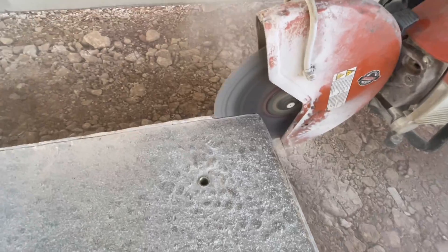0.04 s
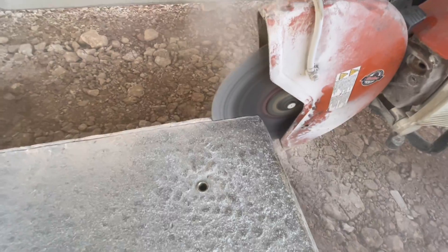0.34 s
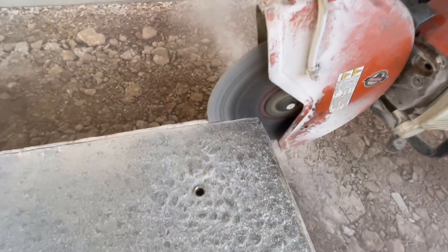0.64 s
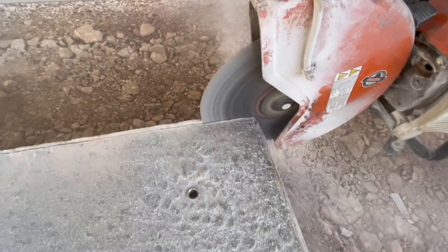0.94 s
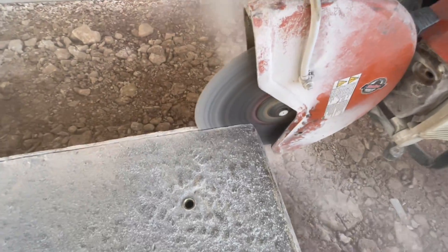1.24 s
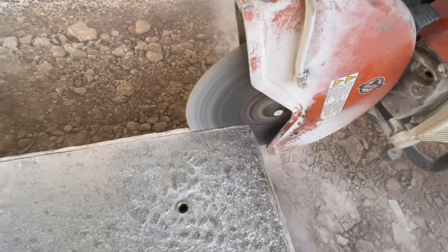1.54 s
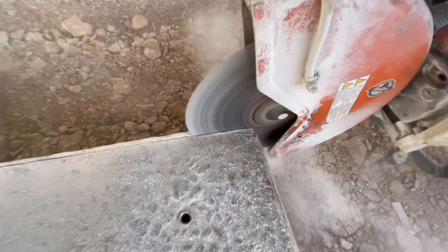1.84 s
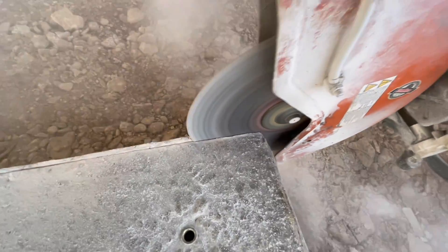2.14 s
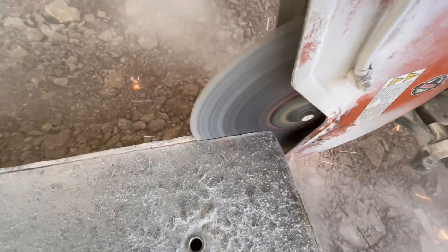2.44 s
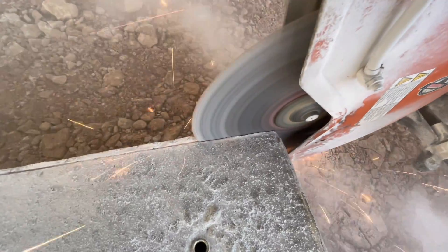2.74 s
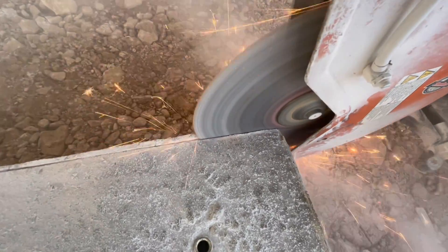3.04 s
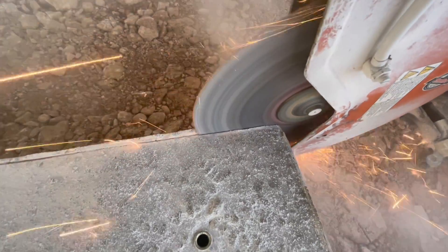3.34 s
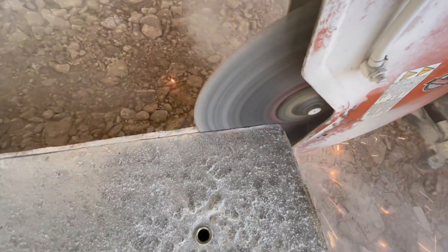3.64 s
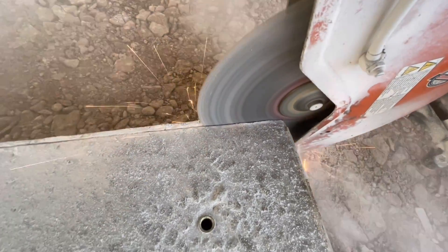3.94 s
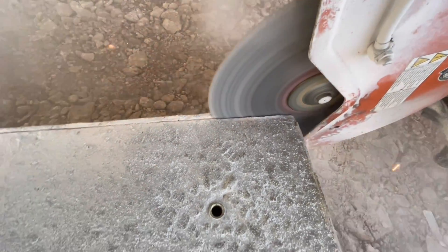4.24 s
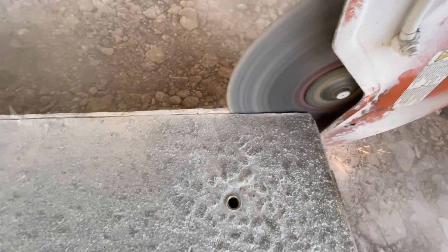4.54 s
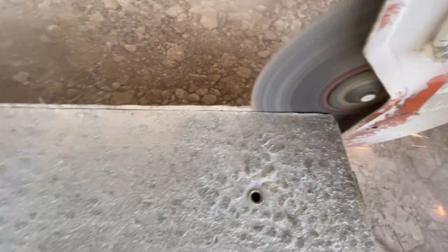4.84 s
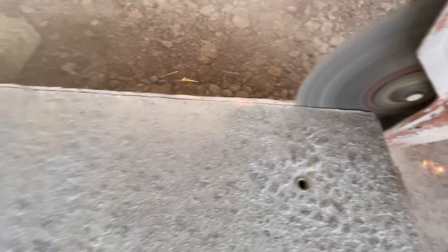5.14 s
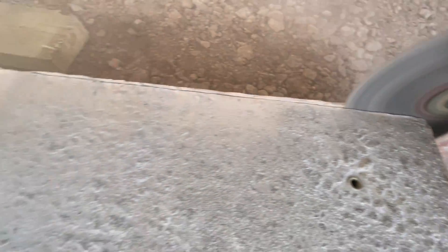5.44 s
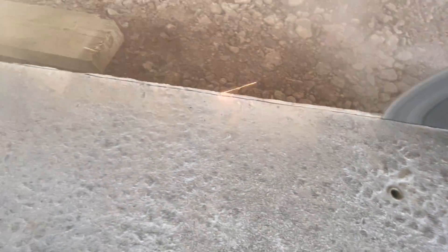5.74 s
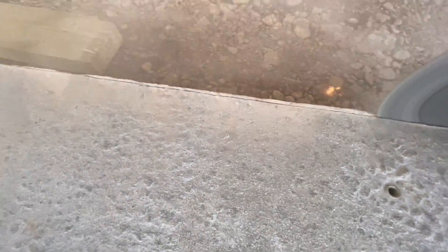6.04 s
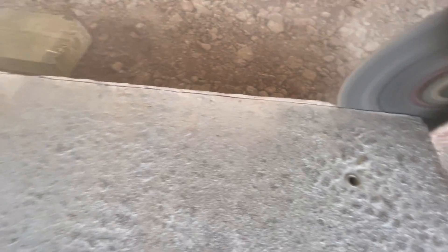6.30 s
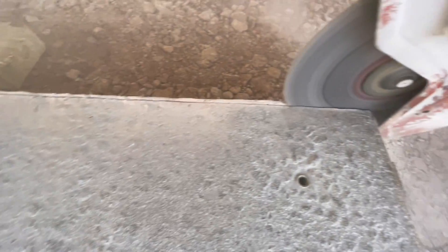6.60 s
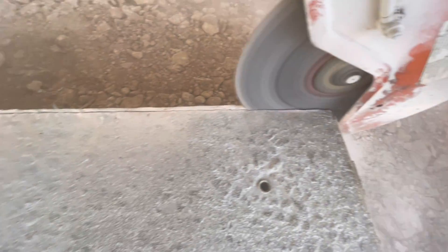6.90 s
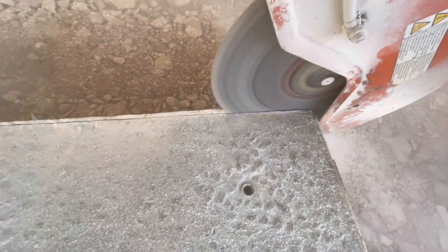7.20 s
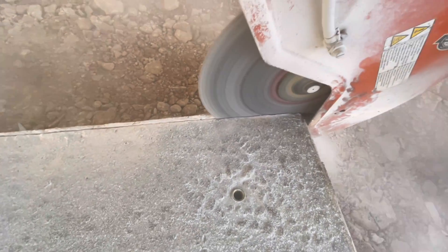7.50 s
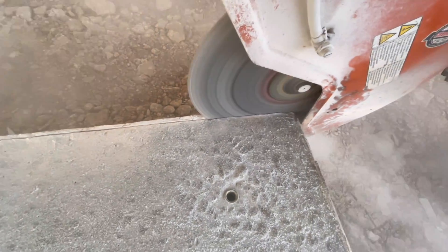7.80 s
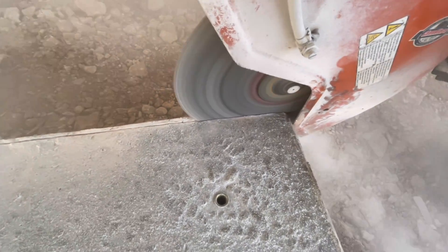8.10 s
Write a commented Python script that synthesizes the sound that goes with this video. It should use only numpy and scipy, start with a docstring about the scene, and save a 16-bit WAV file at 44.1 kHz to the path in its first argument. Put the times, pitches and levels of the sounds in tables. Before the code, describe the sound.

A two-stroke disc cutter grinds into a concrete slab at full throttle for about eight seconds, outdoors and at arm's length. At first a bright rasp and sharp sizzle ride over a rapid, uneven exhaust bark and a low drone, with a thin ringing from the steel blade. The rasp fades by 2 seconds, as a coarser, gritty scrape and high hiss build. From about 2.3 to 4.5 seconds the engine runs more evenly, its pitch sagging and recovering slightly under load. The grinding surges near 4.2 seconds, and brief high metallic tones come and go. Around 5.5 to 6 seconds the exhaust recedes while the scraping continues and a faint whine appears. The grinding swells again from 6.4 to 6.8 seconds. The exhaust then grows louder, with low fluttering bursts from 7 seconds, and the saw is still cutting at the end.

```python
"""A two-stroke disc cutter at full throttle grinds into a concrete slab, outdoors, at arm's length.
Grit scrapes and hisses in the slot and rings the steel blade. The exhaust barks once a turn, unevenly
in threes, over a low drone. The saw reaches the two ports of a camera's stereo microphone out of step;
a wind filter closes in and folds the low end to mono."""
import sys
import numpy as np
from scipy import signal
from scipy.fft import rfft, irfft, next_fast_len
from scipy.io import wavfile
from scipy.ndimage import uniform_filter1d, map_coordinates

SR = 44100
rng = np.random.default_rng(int(sys.argv[2]) if len(sys.argv) > 2 else 0)


def generate_wav(signal):
    """Clip the signal to [-1, 1] and save it as 16-bit WAV at the path in sys.argv[1]."""
    frames = np.transpose(np.atleast_2d(signal))
    scaled = np.clip(frames, -1, 1) * 32767
    pcm = np.round(scaled).astype(np.int16)
    wavfile.write(sys.argv[1], SR, pcm)


N = 368676

# exhaust level as saw and microphone move: time_s, level_db
BARK_LEVEL = [(0, -39), (.65, -37.5), (.9, -34), (2.2, -31), (2.33, -37), (4.35, -37), (5.3, -39),
              (5.75, -41.5), (6.7, -33), (7.8, -31), (8.36, -25.5)]
# the low end booms at first: time_s, gain_db
BOOM_GAIN = [(0, 9), (.88, 11.5), (.96, 7.5), (2.06, 8), (2.14, 0)]
# the exhaust points away for a moment: middle_s, length_s, bark_gain_db, chuff_gain_db
TURNED_AWAY = (5.88, .55, -7.5, 2.5)


def blade(turns):
    """The rim grinds concrete; its bite wavers with the hand and throbs faintly with the engine."""
    # blade in the slot: time_s, scrape_db, hiss_db
    cut = [(0, -45, -37), (.85, -61, -30), (1.42, -49, -30), (1.68, -42, -31), (2, -39, -29.5),
           (2.2, -35, -26.5), (2.8, -34, -28), (4.1, -34.5, -26.5), (4.75, -35, -26.5), (5.2, -33.5, -29),
           (6.15, -31.5, -28.5), (6.36, -32, -24.5), (6.8, -35, -25.5), (7.05, -35, -24.5),
           (8.36, -39, -26)]
    # the rim loses its grip, or catches: middle_s, length_s, gain_db
    slips = [(3.496, 0.088, -0.5), (5.552, 0.075, -5.5), (5.985, .06, -3.5), (6.08, 0.028, -1.5),
             (6.652, 0.085, -1)]
    surges = [(0.063, 0.088, 2), (.405, .03, 2.5), (3.305, 0.15, 1.5), (4.21, 0.16, 3.5), (5.886, 0.085, 2),
              (6.47, 0.28, 3), (6.775, 0.11, 5)]
    # a sharp sizzle peaks early and fades: time_s, level_db
    sizzle_level = [(0, -36), (.55, -32), (1.4, -37), (2.6, -40), (4.2, -43), (4.9, -55)]
    # colours of the grinding: frequency_hz, level_db
    scrape_spectrum = [(600, -22), (1150, -3), (1450, 1), (1950, -2), (2280, -8.5), (2800, -5.5),
                       (3400, -6.5), (3600, -.5), (4500, -1.5), (5300, -3), (6200, -4), (6650, -6),
                       (7400, -8), (7900, -19), (10000, -32)]
    hiss_spectrum = [(7000, -58), (7930, -10.5), (8010, -1), (9000, -6), (10500, -8), (12200, -7.5),
                     (13500, -15.5), (15700, -7.5)]
    rasp_spectrum = [(1000, -31), (1900, -12), (2600, -5), (3150, -2), (3900, .5), (4500, -.5), (5000, -7),
                     (5700, -5.5), (6500, -4.5), (7250, -4.5), (7800, -4), (8100, -8), (9000, -10),
                     (15000, -24)]
    sizzle_spectrum = [(4800, -28), (5700, -7), (6300, -2), (6700, -1), (7250, 0), (7800, 0), (8100, -9),
                       (9500, -30)]
    # friction makes a mode sing out: middle_s, length_s, pitch_hz, width_hz, level_db
    songs = [(.15, 1, 3612, 11, -35.5), (.03, .55, 3810, 110, -39), (.1, .6, 4460, 70, -41),
             (.95, .9, 3885, 11, -45.5), (1.6, 1, 6150, 160, -46), (.2, .5, 8054, 12, -43),
             (1.38, .5, 8054, 16, -38.5), (1.8, .9, 1225, 18, -44), (2.35, .5, 7210, 70, -43),
             (1.1, .6, 5610, 25, -46), (2.7, 1, 5680, 30, -45), (3.9, 1.1, 7240, 60, -46),
             (4.15, .5, 5720, 40, -45), (4.2, .35, 8445, 14, -38), (4.37, .3, 1217, 14, -41),
             (4.4, .35, 2450, 25, -47), (4.7, .3, 8054, 12, -35), (5.4, .6, 4470, 40, -48),
             (5.5, 1.2, 2450, 16, -54), (6.2, 1, 3612, 14, -43.5), (6.7, .6, 5020, 30, -46),
             (8.1, .5, 3612, 20, -50), (6.75, .7, 8910, 30, -38)]
    scrape_db, hiss_db = curves(cut)
    sizzle_db, = curves(sizzle_level)
    slip_db = passing_db(slips)
    bite = amp(.35 * wobble(9) + .45 * wobble(25) + .3 * wobble(90) + .12 * np.sin(2 * np.pi * turns))
    pressure = amp(passing_db(surges) + .55 * slip_db + .65 * wobble(9))
    # a bright rasp opens loud and fades to a trace within two seconds
    t = np.arange(N) / SR
    half_faded_s, fade_s, fall_db_per_s = 1.56, .99, 5.5
    opening = np.clip(.5 + (half_faded_s - t) / fade_s, 0, 1)
    rasp_gain = opening * amp(-25.5 - fall_db_per_s * t) + amp(scrape_db - 24)
    scrape = amp(scrape_db - .5) * grit(scrape_spectrum, grain_db=1.8)
    hiss = amp(hiss_db + slip_db + .31) * grit(hiss_spectrum, grain_db=.4)
    rasp = rasp_gain * grit(rasp_spectrum, grain_db=1.5)
    sizzle = amp(sizzle_db) * grit(sizzle_spectrum, grain_db=4)
    song = sum(amp(db) * swell(s, length) * singing(hz, width) for s, length, hz, width, db in songs)
    return bite * (pressure * (scrape + rasp) + hiss + sizzle + song)


def grit(spectrum, grain_db):
    """Countless grains ring the blade; the moving contact favours now one mode, now another."""
    # modes of the steel, over the grinding noise: pitch_hz, width_hz, gain_db
    steel_modes = [(2450, 38, 6.5), (2660, 50, 2), (2900, 60, 3), (3300, 50, 2), (3600, 50, 7),
                   (3870, 45, 7.5), (4070, 50, 6), (4460, 110, 6), (4980, 60, 8), (5100, 40, 4),
                   (5590, 65, 8), (5730, 65, 8), (6150, 60, 6), (6320, 60, 8.5), (6820, 60, 5),
                   (7080, 40, 6), (7230, 60, 9), (7470, 45, 5), (7620, 35, 5), (7790, 35, 3),
                   (8054, 45, 12), (8250, 42, 10.5), (8405, 52, 11.5), (8570, 35, 6), (8750, 45, 6.5),
                   (8925, 75, 12), (9070, 30, 6), (9330, 70, 4.5), (9530, 50, 2), (9724, 110, 7.5),
                   (10060, 40, 8.5), (10135, 40, 7), (10400, 50, 2), (10850, 65, 6), (11030, 90, 6),
                   (11390, 100, 4), (12030, 180, 3), (12550, 50, 3), (13140, 70, 7), (13620, 50, 4)]
    centre, width, db = np.transpose(steel_modes)
    hz, t, grains = signal.stft(noise() * amp(grain_db * wobble(1500)), SR, nperseg=2048)
    wander_db = 1.8 * unit(uniform_filter1d(rng.standard_normal((len(db), len(t))), size=11, axis=1))
    ring = np.sqrt(1 + mode(hz[:, None], centre, width) ** 2 @ amp(db[:, None] + wander_db) ** 2)
    patches_db = 2.4 * unit(uniform_filter1d(rng.standard_normal(grains.shape[1:]), size=9, axis=1))
    gain = ring * amp(along(spectrum, hz)[:, None] + patches_db)
    return unit(signal.istft(grains * gain, SR, nperseg=2048)[1][:, :N])


def engine(turns):
    """The two-stroke fires once a turn, one firing in three strong; its low end evens out under load."""
    # depth of the three-firing pattern: time_s, share
    unevenness = [(0, 1), (2.1, 1), (2.4, .1), (4.6, .1), (4.9, .35), (8.36, .45)]
    # heavy load, active only where the end follows the start: start_s, end_s
    heavy_load = [(2.32, 3.2), (3.72, 4.1), (4.42, 4.72), (7.86, 7.3)]
    uneven, = curves(unevenness)
    bark_db, boom_db = curves(BARK_LEVEL) + curves(BOOM_GAIN)
    rise_db = bark_db - bark_db.mean()
    t = np.arange(N) / SR
    loaded = uniform_filter1d(sum(1. * (t > start) * (t < end) for start, end in heavy_load), size=3000)
    low_tones = drone(turns, loaded, rise_db, boom_db)
    ringing = muffler(turns, rise_db, boom_db)
    pulses, puffs = firings(turns, [4, -1.5, -2.5], uneven, scatter_db=.8, jitter_s=.00025)
    exhaust = throb(turns, depth=.28 * uneven) * bark(pulses, puffs, ringing, bark_db)
    low_gas = chuff(turns, puffs, loaded, rise_db, boom_db) + flutter(puffs, boom_db)
    return exhaust + low_gas + direct(low_tones + whine(turns))


def firings(turns, pattern_db, uneven, scatter_db, jitter_s, puff_turns=.42):
    """Pressure pulses, one a turn, and the envelope of the gas puff after each."""
    count = np.arange(1, int(turns[-1]))
    size_draw, time_draw = rng.standard_normal((len(count), 2)).T
    accent_db = np.array(pattern_db)[count % len(pattern_db)] * np.interp(count, turns, uneven)
    size = amp(accent_db + scatter_db * size_draw)
    at = np.interp(count, turns, np.arange(N)) + jitter_s * SR * time_draw
    pulses = np.bincount(np.clip(at, 0, N - 1).astype(int), size, N)
    latest = np.clip(turns.astype(int) - 1, 0, len(size) - 1)
    return pulses, unit(size[latest] * np.exp(-(turns % 1) / puff_turns))


def bark(pulses, puffs, ringing, bark_db):
    """Each firing knocks the ringing muffler and lets out a puff of gas."""
    # the muffler's response: frequency_hz, level_db
    spectrum = [(420, -31), (600, -18), (680, 5), (780, 2), (880, -2.5), (950, 2.5), (1100, 4), (1240, 7.5),
                (1400, -0.5), (1600, -6), (1800, -13.5), (2100, -12.5), (3000, -60), (5000, -42)]
    away_s, length_s, away_db, _ = TURNED_AWAY
    knock = amp(bark_db - 14) * coloured(pulses, spectrum)
    gas = amp(bark_db - 4.5) * coloured(noise() * (puffs + 1.2), spectrum)
    return direct(amp(away_db * swell(away_s, length_s)) * (ringing + knock)) + gas


def muffler(turns, rise_db, boom_db):
    """The muffler picks out a few engine orders, and its shell rings at a pitch of its own."""
    # favoured lines: cycles_per_three_turns, level_db, rise_share, boom_share
    lines = [(14, -60.5, .7, 1.1), (15, -49.6, .25, .8), (18, -45.3, 1, -.45), (21, -53.5, 1.55, .1)]
    lag_turns, smear_rad = .3, 1.1  # the lines swell together after each firing, a little smeared
    snarl = 0
    for k, db, rise_share, boom_share in lines:
        gain = amp(db + rise_share * rise_db + boom_share * boom_db + 1.2 * wobble(25))
        phase = 2 * np.pi * k / 3 * (turns - lag_turns) + smear_rad * (k % 2) + .14 * wobble(35)
        snarl += gain * np.sqrt(2) * np.cos(phase)
    return snarl + amp(-58 + boom_db) * singing(centre_hz=712, width_hz=16)


def drone(turns, loaded, rise_db, boom_db):
    """Low orders hum, the first growing with the revs; heavy load brings in a half order."""
    # the drone dips briefly: middle_s, length_s, gain_db
    dips = [(1.15, .5, -3.3), (3.45, .25, -1.5), (5.5, .6, -3.8), (7.75, .3, -1.2)]
    # weaker lines, against the first order: cycles_per_three_turns, gain_db
    weak_orders = [(1, -12.5), (2, -12.5), (4, -9.5), (9, -13.5), (10, -16.5), (12, -39)]
    speed_hz = np.gradient(turns) * SR
    dip_db = passing_db(dips)
    first_db = -47.5 + dip_db + .25 * rise_db + .34 * (speed_hz - speed_hz.mean())
    second_db = -49.8 + dip_db + .5 * rise_db + boom_db
    first = amp(first_db + .5 * wobble(30)) * tone(turns, 1, blur_rad=.06)
    second = amp(second_db + .7 * wobble(30)) * tone(turns, 2, blur_rad=.1)
    second *= throb(turns, depth=.42 * (1 - loaded))
    lines = sum(amp(db + 1.8 * wobble(20)) * tone(turns, k / 3, blur_rad=.2) for k, db in weak_orders)
    half = loaded * amp(-9 + 3 * wobble(25)) * tone(turns, .5, blur_rad=.62)
    return first + second + amp(first_db) * (lines * amp(-8 * loaded) + half)


def chuff(turns, puffs, loaded, rise_db, boom_db):
    """Each firing gives a low thump and a rush of gas."""
    # the exhaust's rumble: frequency_hz, level_db
    spectrum = [(20, -52), (40, -24), (70, 0.5), (110, -5), (210, 2), (260, -8), (335, 6), (430, -3),
                (580, -3.5), (900, -21)]
    away_s, length_s, _, away_db = TURNED_AWAY
    level_db = -52.5 + .3 * rise_db + boom_db + away_db * swell(away_s, length_s)
    pulses, _ = firings(turns, [5, -3, -4], uneven=1 - loaded, scatter_db=1.5, jitter_s=.0003)
    thump = -amp(-3.5) * coloured(pulses, spectrum)
    rush = coloured(noise() * (puffs + .75), spectrum)
    return amp(level_db) * (direct(thump) + rush)


def flutter(puffs, boom_db):
    """Exhaust gas flutters in a low resonance."""
    # the resonance: frequency_hz, level_db
    spectrum = [(200, -46), (310, -40), (355, 3.5), (400, 8), (430, 6.5), (470, -17.5), (600, -39),
                (900, -55)]
    # bursts of gas: middle_s, length_s, level_db
    bursts = [(7.078, 0.17, -41.5), (7.42, 0.27, -43.5), (7.81, 0.19, -37), (8.093, 0.12, -32.5),
              (8.328, 0.19, -35.5)]
    gain = amp(-68 + boom_db) + sum(amp(db) * swell(s, length) for s, length, db in bursts)
    return gain * coloured(noise() * (puffs + .98), spectrum)


def whine(turns):
    """Faint tones locked to the shaft come and go."""
    # shaft whines: middle_s, length_s, cycles_per_turn, level_db
    whines = [(1.7, 1, 12, -50), (4, 4, 12, -57), (5.95, .9, 12, -51), (6.65, .6, 12, -48),
              (7.7, 1.2, 12, -53), (6.25, .5, 6, -51), (6.05, .35, 4, -60), (5.85, .8, 25, -43),
              (6, 1, 3, -62)]
    return sum(amp(db + 1.5 * wobble(20)) * swell(s, length) * tone(turns, k, blur_rad=.5)
               for s, length, k, db in whines)


def microphone(sound):
    """Direct and scattered sound at two ports, joined to mono under the wind filter's edge."""
    # phase between the ports: frequency_hz, left_lead_rad
    port_phase = [(100, 0.14), (300, -.9), (700, -2.5), (1100, -3.05), (1640, -3.35), (2200, -3.6),
                  (2650, -3.16), (3250, -3.16), (3900, -4.6), (4550, -3.8), (5000, -4.8), (5600, -4.9),
                  (6800, -3.25), (7700, -3.05), (8050, -2.1), (8500, -1.8), (9300, -1.9), (10500, -.15),
                  (11300, .1), (13400, 2.8), (15600, 3.8)]
    # how alike the ports sound: frequency_hz, likeness
    likeness = [(200, .95), (700, .93), (1150, .91), (1400, .67), (2050, .55), (2450, .6), (2700, .92),
                (3200, .96), (3500, .55), (4100, .68), (5300, .62), (6200, .72), (6900, .98), (7600, .98),
                (8100, .85), (9000, .93), (10200, .92), (11000, .98), (12500, .8), (14400, .96)]
    # the loudest blade modes favour the right port: frequency_hz, left_minus_right_db
    balance = [(7850, 0), (8030, -3), (8600, -.4), (9200, -1.2), (10200, -.7), (10500, 0)]
    # the wind filter closes in: time_s, edge_hz
    wind_filter = [(0, 55), (.25, 115), (.4, 215), (.5, 370), (.7, 460), (.9, 610), (1.05, 700), (1.3, 770),
                   (8.4, 785)]
    hz, t, (straight, scattered) = signal.stft(sound, SR, nperseg=1024)
    hz = hz[:, None]
    edge_hz = np.interp(t, *np.transpose(wind_filter))
    apart_ratio = 2.15  # full stereo from this multiple of the edge up
    apart = np.sin(np.pi / 2 * np.clip((hz / edge_hz - 1) / (apart_ratio - 1), 0, 1)) ** 2
    spread = apart * np.arccos(np.clip(along(likeness, hz), 0, 1)) / 2
    lead = np.exp(.5j * apart * along(port_phase, hz)) * amp(along(balance, hz) / 2)
    mid, side = straight * np.cos(spread), scattered * np.sin(spread)
    return signal.istft(np.array([(mid + side) * lead, (mid - side) / lead]), SR, nperseg=1024)[1][:, :N]


def tone(turns, order, blur_rad):
    """A sine at a multiple of the shaft speed, its phase wavering."""
    return np.sqrt(2) * np.sin(2 * np.pi * (order * turns + rng.random()) + blur_rad * wobble(35))


def throb(turns, depth):
    """A gain that peaks with every third firing."""
    return 1 + depth * np.cos(2 * np.pi * (turns - 1 / 3) / 3)


def singing(centre_hz, width_hz):
    """One lightly damped mode, kept going by noise."""
    m = next_fast_len(N)
    response = mode(np.fft.rfftfreq(m, 1 / SR), centre_hz, width_hz)
    return unit(irfft(rfft(rng.standard_normal(m)) * response, m)[:N])


def mode(hz, centre_hz, width_hz):
    """Gain of one resonance."""
    return 1 / (1 + ((hz - centre_hz) / width_hz) ** 2)


def coloured(x, spectrum):
    """x through a causal filter of (Hz, dB) points, at rms 1."""
    m = 2 * next_fast_len(N // 2 + 8192)
    gain = amp(along(spectrum, np.fft.rfftfreq(m, 1 / SR)))
    cepstrum = irfft(np.log(np.maximum(gain, 1e-6)))
    cepstrum[1:m // 2] *= 2
    cepstrum[m // 2 + 1:] = 0
    return unit(irfft(rfft(x, m) * np.exp(rfft(cepstrum)), m)[..., :N])


def noise():
    """Two unrelated noises: the direct part of a sound and its scattered part."""
    return rng.standard_normal((2, N))


def direct(x):
    """A sound with no scattered part."""
    return np.array([x, np.zeros(N)])


def wobble(rate):
    """A smooth random curve, rate knots a second."""
    return map_coordinates(rng.standard_normal(int(N * rate / SR) + 4), [np.arange(N) * rate / SR])


def swell(middle_s, length_s):
    """A smooth rise to 1 and fall."""
    return np.exp(-2 * ((np.arange(N) / SR - middle_s) / length_s) ** 2)


def passing_db(rows):
    """Brief rises and dips summed into one level curve."""
    return sum(db * swell(s, length) for s, length, db in rows)


def curves(rows):
    """One value per sample for each column after the time."""
    s, *cols = np.transpose(rows)
    return [np.interp(np.arange(N) / SR, s, c) for c in cols]


def along(points, hz):
    """(Hz, value) points read on a log axis."""
    f, v = np.transpose(points)
    return np.interp(np.log(hz + 1), np.log(f + 1), v)


def amp(db):
    """Decibels to gain."""
    return 10 ** (np.asarray(db) / 20)


def unit(x):
    """Scaled to rms 1."""
    return x / np.sqrt(np.mean(x ** 2) + 1e-20)


def scene():
    """Engine and blade share one shaft, whose speed sags as the cut deepens."""
    # engine speed: time_s, firing_rate_hz
    revs = [(0.0, 145.0), (0.36, 143.6), (1.34, 143.2), (1.61, 140.8), (1.91, 139.7), (2.33, 136.5),
            (2.8, 139.8), (3.31, 142.6), (3.63, 135.8), (4.09, 139.2), (4.4, 136.2), (4.7, 144.7),
            (5.1, 143.0), (5.47, 140.8), (5.88, 144.7), (6.31, 147.5), (7.29, 145.5), (7.79, 139.5),
            (8.02, 143.2), (8.36, 142.0)]
    speed_hz, = curves(revs)
    turns = np.cumsum(speed_hz * (1 + .0012 * wobble(18))) / SR
    return microphone(engine(turns) + blade(turns))


def record(dry):
    """The camera keeps nothing above its band limit."""
    top_hz = 15850
    m = next_fast_len(N + 8192)
    return irfft(rfft(dry, m) * (np.fft.rfftfreq(m, 1 / SR) < top_hz), m)[:, :N]


dry = scene()
out = record(dry)
generate_wav(out)
```